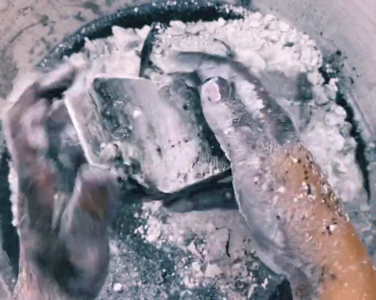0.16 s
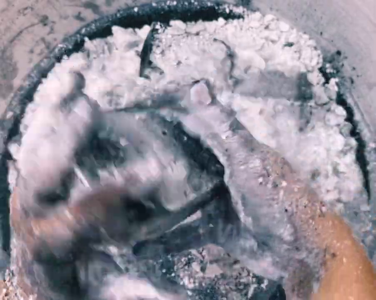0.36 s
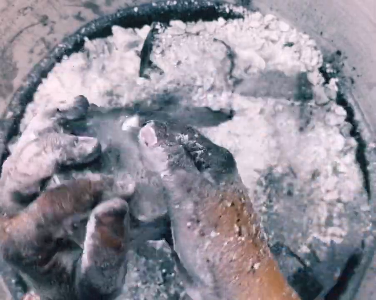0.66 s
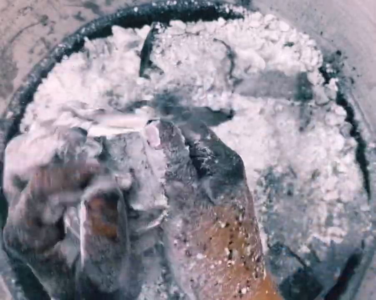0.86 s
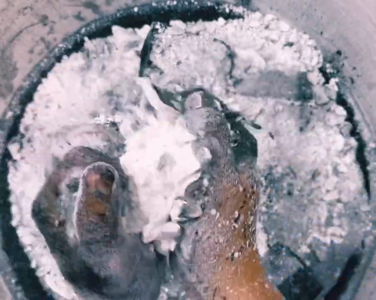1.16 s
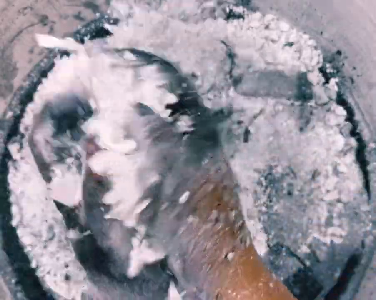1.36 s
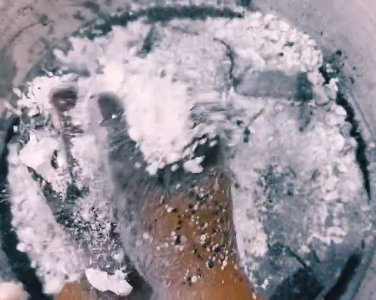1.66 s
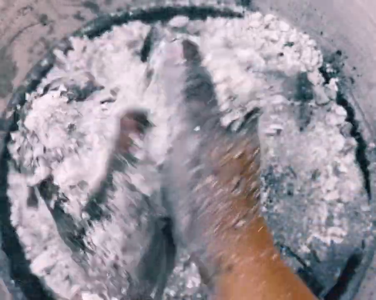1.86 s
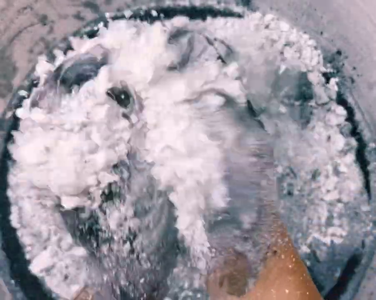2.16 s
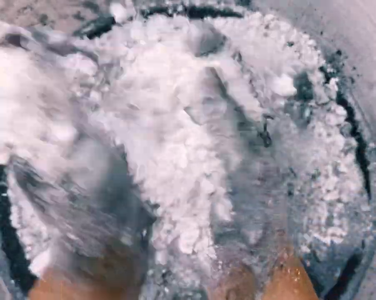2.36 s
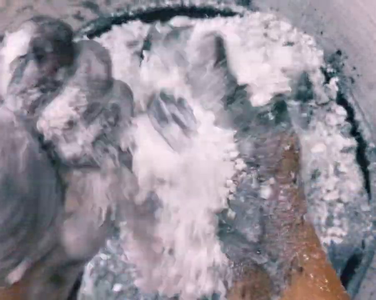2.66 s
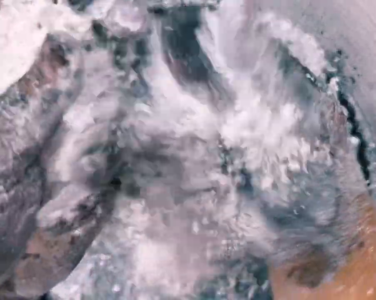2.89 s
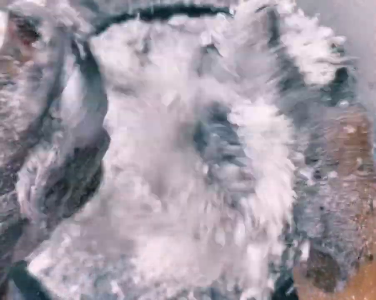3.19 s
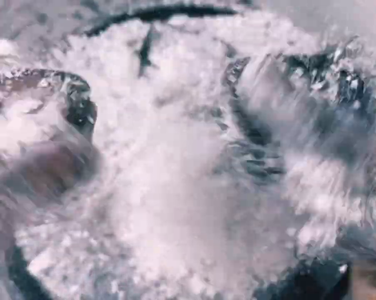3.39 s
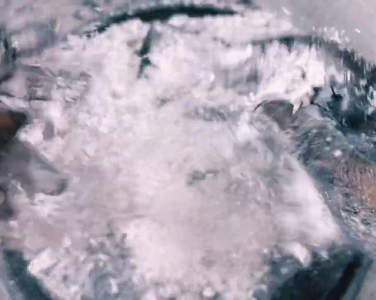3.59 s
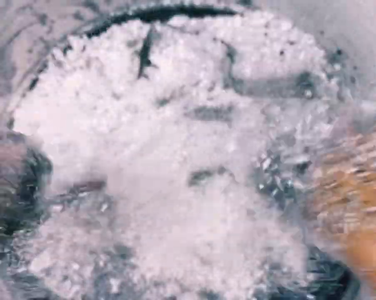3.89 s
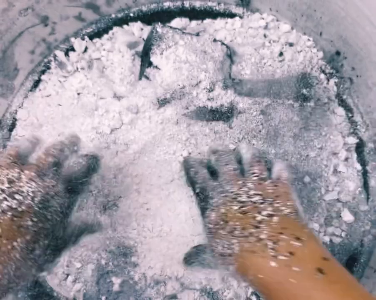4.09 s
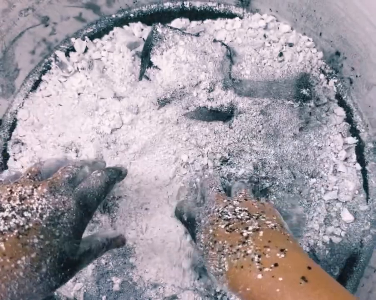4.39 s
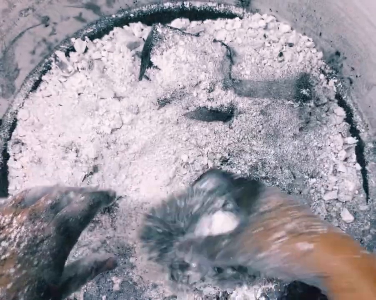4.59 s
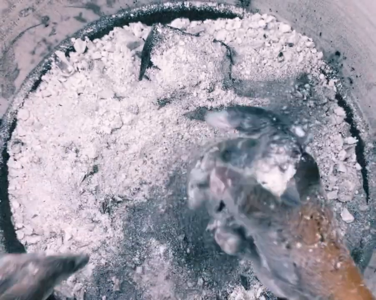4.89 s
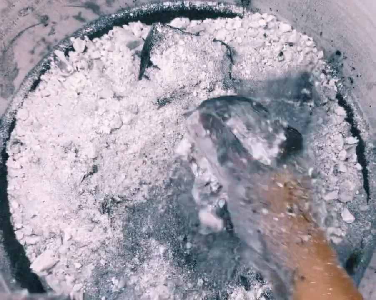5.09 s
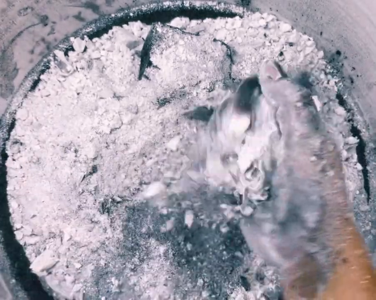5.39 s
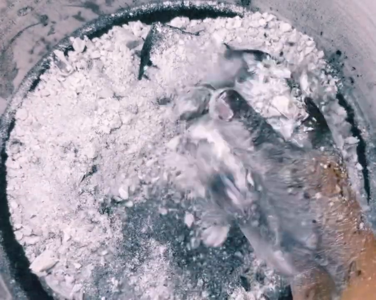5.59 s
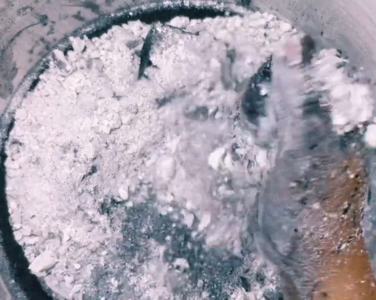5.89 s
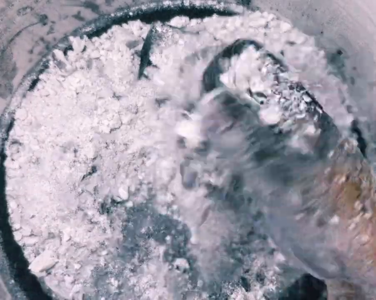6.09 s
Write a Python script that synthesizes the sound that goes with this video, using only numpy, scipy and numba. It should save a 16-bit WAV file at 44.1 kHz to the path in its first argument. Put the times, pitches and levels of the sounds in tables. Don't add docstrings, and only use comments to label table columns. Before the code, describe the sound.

Dry chalk block cracks apart in hands with sharp brittle crunches, crumbs patter into a bowl, dull knocks thump, then a second block snaps.

```python
import sys
import numpy as np
from scipy import signal
from scipy.fft import rfft, irfft, next_fast_len
from scipy.io import wavfile
from scipy.ndimage import uniform_filter1d
from numba import njit

SR = 44100
rng = np.random.default_rng(int(sys.argv[2]) if len(sys.argv) > 2 else 0)


def undo_db(level):
    steps = np.asarray(level, float) / 20
    return 10 ** steps


def int16_out(signal):
    q = np.round(np.clip(np.atleast_2d(signal).T, -1, 1) * 32767)
    wavfile.write(sys.argv[1], SR, q.astype(np.int16))


N = 275623
SPAN = 4096
SPAN_HZ = np.arange(SPAN // 2 + 1) * SR / SPAN + 1


def level(x, db):
    return x * undo_db(db) / np.sqrt(np.mean(x ** 2))


def colour(x, points):
    hz, db = np.transpose(points)
    size = next_fast_len(len(x))
    f = np.arange(size // 2 + 1) * SR / size + 1
    gain = undo_db(np.interp(np.log(f), np.log(hz), db))
    return irfft(rfft(x, size) * gain, size)[:len(x)]


def hump(hz, centre_hz, octaves):
    return np.exp(-.5 * (np.log2(hz / centre_hz) / octaves) ** 2)


def walk(rate_hz):
    hold = int(SR / rate_hz)
    steps = rng.standard_normal(N // 100)[:N // hold + 1]
    return 1.83 * uniform_filter1d(np.repeat(steps, hold), hold)[:N]


def fade(t60_s, size=SPAN):
    return np.exp(-np.log(1000) * np.arange(size) / SR / max(t60_s, .002))


def ring(modes, size=SPAN):
    t = np.arange(size) / SR
    return sum(gain * np.sin(2 * np.pi * hz * t) * fade(t60_s, size) for hz, gain, t60_s in modes)


def add(out, s, peak_db, sound):
    i = int(s * SR)
    sound = sound * np.minimum(np.linspace(4, 0, len(sound)), 1)
    out[i:i + len(sound)] += (sound * undo_db(peak_db) / np.abs(sound).max())[:N - i]


def read(rows):
    s, *columns = np.transpose(rows)
    return [np.interp(np.arange(N) / SR, s, c) for c in columns]


def swells(rest_db, times_s, peaks_db, rises_s, falls_s):
    t = np.arange(0, N, 64) / SR
    power = undo_db(2 * rest_db[::64])
    for s, db, rise_s, fall_s in zip(times_s, peaks_db, rises_s, falls_s):
        away = np.where(t < s, (s - t) / rise_s, (t - s) / max(fall_s, .01))
        power = power + undo_db(2 * (db - 20 * away))
    return np.interp(np.arange(N) / SR, t, 10 * np.log10(power))


# (frequency [Hz], density [dB per Hz])
ROOM_TONE = [(12, -22), (20, -2.5), (69, -2.5), (169, -10.5), (350, -16), (648, -32.5), (1990, -29.5),
             (3900, -32), (5160, -36), (10400, -50), (15000, -40), (16300, -40)]


def room():
    return level(colour(rng.standard_normal(N), ROOM_TONE), -46)


# (time [s], boom level [dB], sway level [dB], 20 dB fall [s])
PUSHES = [(0.0, -46, -33, 0.43), (.33, -43, -43, 0.1), (.6, -38.5, -48, 0.2), (.818, -33.5, -37, 0.07),
          (1.024, -23.5, -53, 0.16), (1.239, -26.5, -46, 0.2), (.74, -50, -45, .1), (1.5, -28, -45, .1),
          (1.377, -28, -44, 0.3), (1.582, -21.5, -53, 0.4), (1.762, -37.5, -33, 0.27),
          (2.337, -37, -44, 1.4), (2.6, -29, -55, 0.96), (3.312, -31.5, -36.5, 0.6), (3.7, -34, -45, 0.13),
          (3.853, -53, -29, 0.05), (3.941, -35, -56, 0.03), (4.218, -28.5, -20, 0.26),
          (4.88, -37, -54.5, 0.1), (5.218, -33, -30, 0.5), (5.773, -37, -42, 1.9)]


def shaking():
    s, boom_db, sway_db, fall_s = np.transpose(PUSHES)
    rise_s = 0.78 * fall_s
    shake = swells(np.full(N, -57.), s, boom_db, rise_s, fall_s)
    sway = swells(np.full(N, -46.), s, sway_db, rise_s, fall_s)
    return shake, sway


# (frequency [Hz], level [dB], share of ring time [ratio])
TABLE_MODES = [(61, -36, 0.51), (82.6, -0.5, 0.86), (98.1, -0.5, 2.26), (139, 0, 0.95), (215.8, -2, 0.51),
               (251, -5.5, 0.24)]


def table(shake_db, sway_db):
    rub = rng.standard_normal(N) * undo_db(2.26 * walk(25))
    modes = [(hz, undo_db(db), 0.13 * share) for hz, db, share in TABLE_MODES]
    boom = signal.fftconvolve(rub, ring(modes))[:N]
    sway = colour(rng.standard_normal(N),
                  [(12, -34), (30, -5), (40, -7.5), (52, -9.0), (64, -8.0), (110, -16.5), (600, -69)])
    return level(boom, -2.6) * undo_db(shake_db) + level(sway, -2.8) * undo_db(sway_db)


@njit
def grains(start, hz, cycles, size, length):
    out = np.zeros(length + 2000)
    for k in range(len(start)):
        w = 2 * np.pi * hz[k] / SR
        pole = np.exp(1j * w - w / (2 * cycles[k]))
        z = size[k] + 0j
        for i in range(start[k], start[k] + min(2000, int(12 * cycles[k] / w))):
            out[i] += z.imag
            z *= pole
    return out[:length]


def patter(count, low_hz, high_hz, cycles, scatter_db, clump_db, dust_db):
    when, pitch, long, big = rng.random((count, 4)).T
    hz = low_hz * (high_hz / low_hz) ** pitch
    size = undo_db(-scatter_db * np.log(1.008 - big)) * np.sqrt(hz / low_hz)
    turns = cycles * (0.44 + 4 * long ** 4)
    crumbs = grains((when * N).astype(np.int64), hz, turns, size / np.sqrt(turns), N)
    band = signal.butter(2, [low_hz, min(high_hz, 20000)], "bandpass", fs=SR, output="sos")
    crumbs, dust = signal.sosfilt(band, [crumbs, rng.standard_normal(N)])
    clumps = undo_db(clump_db * (walk(30) + walk(90) + walk(250)))
    return (level(crumbs, 0) + level(dust, dust_db)) * clumps


def patches(x, depth_db):
    size = next_fast_len(N)
    f = np.arange(size // 2 + 1) * SR / size + 1
    spectrum = rfft(x, size)
    bands = [hump(f, hz, .2) for hz in 1500 * 2 ** np.arange(0, 3.6, .5)]
    total = sum(bands) + 1e-9
    return sum(irfft(spectrum * band / total, size)[:N] * undo_db(depth_db * walk(25)) for band in bands)


# (time [s], effort [dB])
EFFORT = [(0, -40.5), (.064, -45), (.126, -57), (.22, -41), (.34, -40.5), (.43, -49.5), (.59, -45.5),
          (.61, -34), (1.3, -38), (1.9, -37.5), (3.03, -42.5), (4.0, -44), (4.04, -61), (4.5, -58),
          (4.78, -51), (5.0, -43.5), (5.4, -45.5), (6.25, -45.5)]
# (time [s], fine level [dB], coarse level [dB], 20 dB fall [s])
SQUEEZES = [(0.474, -38, -68, 0.2), (0.607, -19, -30, 0.24), (.73, -31, -45, .1), (.78, -31, -48, .15),
            (.835, -21.5, -34.5, 0.2), (.985, -55, -27, 0.15), (1.141, -26.5, -28.5, 0.18),
            (1.355, -30, -24.5, 0.38), (1.42, -34.5, -38, 0.2), (1.5, -30, -32, 0.1),
            (1.727, -43, -25.5, 0.12), (2.556, -28, -25, .09), (2.65, -38.5, -40, 0.1),
            (2.715, -35.5, -37, 0.2), (2.85, -35, -38.5, 0.3), (2.91, -36, -42, .15),
            (3.062, -41, -37.5, .5), (3.2, -42.5, -50, 0), (3.38, -40, -57, 0), (3.61, -53, -52.5, 0.2),
            (3.665, -46, -46, 0.06), (3.94, -46, -39, 0.2), (3.999, -55, -42, 0.05), (4.187, -47, -43, 0.1),
            (4.26, -56.5, -47, 0.44), (4.364, -49, -40.5, -0.17), (4.485, -56, -41, 0.17),
            (4.572, -44, -56, .4), (4.633, -30, -42, 0.04), (4.845, -22, -27, .17), (4.96, -30, -38, .1),
            (5.2, -45, -40, 0), (5.478, -56, -41.5, .15), (5.6, -36.5, -41, 0.6), (5.68, -45, -48, 0.4),
            (5.96, -39, -37, 0.3), (6.075, -38.5, -50, -0.6), (6.02, -42, -37, 0.04), (6.235, -61, -40, 4)]


def crumb_levels(grit):
    effort_db = read(EFFORT)[0]
    s, fine_db, coarse_db, fall_s = np.transpose(SQUEEZES)
    rise_s = np.full(len(s), .012)
    rubbing_db, loose_db = -12, -5
    coarse_rest_db = effort_db + rubbing_db + grit * (loose_db - rubbing_db)
    fine = swells(effort_db, s, fine_db, rise_s, fall_s)
    coarse = swells(coarse_rest_db, s, coarse_db, rise_s, fall_s)
    return fine, coarse


# (time [s], loose crumbs against rubbing skin [0-1])
GRIT = [
    (0, 0),
    (.58, 0.09),
    (.6, 0.86),
    (4.0, 0.7),
    (4.05, 0.3),
    (4.5, .3),
    (4.55, .1),
    (4.76, 0.2),
    (4.8, 0.66),
    (6.25, 0.7),
]
# (frequency [Hz], density [dB per Hz])
SKIN_RUB = [(880, -32), (1500, -9.5), (1910, -15), (2520, -14), (2680, -25), (3680, 1), (4970, -6),
            (6440, -0.5), (8780, -7), (10300, -2.5), (14600, -6), (16300, -13)]
# (frequency [Hz], density [dB per Hz])
FINE_CRUMB = [(880, -8), (1500, 7), (1780, 2), (3300, 2.5), (6640, -1.5), (10600, -10.5), (11800, -11.5),
              (15200, -21), (16300, -41)]


def hands():
    grit = np.clip(read(GRIT)[0], 0, 1)
    fine_db, coarse_db = crumb_levels(grit)
    fine = patter(count=9000, low_hz=1700, high_hz=19000, cycles=1.2,
                  scatter_db=2.5, clump_db=.9, dust_db=-7)
    tilted = [(hz, db + 3 * np.log2(hz / 4000)) for hz, db in FINE_CRUMB]
    rub = colour(rng.standard_normal(N), SKIN_RUB) * undo_db(1.87 * walk(30))
    coarse = patter(count=6000, low_hz=330, high_hz=2300, cycles=1.6,
                    scatter_db=1.8, clump_db=1.3, dust_db=-3)
    loose = level(patches(colour(fine, tilted), depth_db=2.0), -0.7)
    top = np.sqrt(grit) * loose + np.sqrt(1 - grit) * level(rub, 0.58)
    return top * undo_db(fine_db) + level(coarse, -4.5) * undo_db(coarse_db)


# (time [s], peak [dB], centre [Hz], ring t60 [s])
KNOCKS = [(0.349, -32, 407, 0.09), (0.6, -16, 1370, 0.1), (0.703, -16.5, 1650, 0.16),
          (0.844, -14, 2100, 0.077), (0.94, -13.5, 1860, 0.093), (0.977, -16, 830, 0.086),
          (1.075, -12.5, 1270, 0.11), (1.12, -19.5, 1810, 0.042), (1.233, -19, 1450, 0.074),
          (1.356, -20, 1160, 0.15), (1.569, -23.5, 770, 0.061), (1.653, -7, 970, 0.089),
          (1.718, -4.5, 774, 0.11), (2.463, -27, 900, 0.15), (2.554, -7.5, 970, 0.036),
          (2.578, -9, 1160, 0.069), (2.771, -27, 474, 0.065), (3.271, -23, 1500, 0.02),
          (3.15, -30, 1110, .02), (2.372, -28, 1300, 0.024), (4.48, -36, 695, 0.046),
          (1.514, -24, 1500, .05), (1.342, -23, 1200, .05), (.612, -19.5, 750, 0.2), (4.176, -30, 380, 0.1),
          (4.828, -20.5, 1730, 0.12), (4.844, -13.5, 337, 0.029), (4.857, -10, 1640, 0.1),
          (4.913, -21, 1720, 0.16), (5.595, -26, 330, 0.085), (0.621, -11, 1360, 0.071),
          (0.627, -12.5, 1910, 0.033), (1.371, -11, 1100, 0.054), (1.389, -23, 910, 0.084),
          (2.565, -10.5, 1220, 0.081), (5.206, -29.5, 470, 0.06), ]
# (frequency [Hz], level [dB])
BOWL_MODES = [(420, -7), (510, -5.5), (640, -43), (720, 5), (855, 11.5), (940, -3), (1125, 9.5), (1250, 12),
              (1400, 12.5), (1650, 16.5), (1900, 18.5), (2150, 18.5)]


def knocks(out):
    for s, peak_db, hz, t60_s in KNOCKS:
        chance = rng.standard_normal((2, len(BOWL_MODES)))
        blow, bed = rng.standard_normal((2, SPAN))
        modes = []
        for (mode_hz, db), a, b in zip(BOWL_MODES, *chance):
            gain = np.sign(a) * undo_db(db + 2.5 * b) * (hump(mode_hz, hz, .5) + .06)
            modes.append((mode_hz * (1 + .02 * a), gain, min(t60_s, .15) * (800 / mode_hz) ** .5))
        push = fade(.002) + .12 * blow * fade(.7 * t60_s)
        bowl = signal.fftconvolve(push, ring(modes))[:SPAN]
        shuffle = bed * (fade(1.3 * t60_s) + 1.5 * fade(.01))
        rattle = irfft(rfft(shuffle) * hump(SPAN_HZ, 1.1 * hz, .5))
        add(out, s, peak_db, level(bowl, 0) + level(rattle, -3))


# (time [s], peak [dB], centre [Hz], treble share [dB])
CRACKS = [(0.662, 1, 3840, -19.5), (0.6806, -5, 3970, -26), (0.704, -9, 3150, -39),
          (0.742, -8.5, 5800, -21), (0.7684, -6, 4000, -25), (0.7813, -6.5, 6140, -19),
          (0.832, -6, 3530, -21), (0.846, -1, 6540, -15), (0.9025, -11, 6840, -17),
          (0.934, -11.5, 3600, -26), (1.0772, -10, 2660, -68), (1.142, -9, 4070, -16),
          (1.1548, -6.5, 4020, -16), (1.224, -9.5, 3800, -11), (1.245, -16, 2370, -12),
          (1.364, -15, 2720, -38), (1.494, -18, 6000, -15), (1.513, -10.5, 3520, -30),
          (1.602, -13, 6150, -21), (1.6567, -8.5, 2430, -39), (1.7186, -10, 3170, -11),
          (1.811, -18.5, 4800, -11), (1.8501, -18, 3880, -8),
          (2.133, -23.5, 4970, -18), (2.2107, -18.5, 4130, -13), (2.2228, -16, 3580, -29),
           (2.3214, -17, 3450, -11), (2.44, -20, 4570, -16.5), (2.498, -13, 5900, -22),
           (2.5548, -5.5, 2130, -33), (2.764, -18, 5330, -36), (2.8536, -20, 5420, -19),
           (2.9023, -15, 3600, -14), (2.9265, -17, 5360, -23), (3.056, -31, 2740, -14),
           (3.2719, -23, 3770, -24), (3.5247, -15.5, 6200, -22), (3.663, -21.5, 6560, -18),
           (3.8331, -19, 8150, -3), (3.9401, -22.5, 3400, -26), (4.0002, -20.5, 3200, -19.5),
          (4.797, -23.5, 3920, -7.5), (4.8126, -20, 3730, -18), (4.8205, -21, 2500, -25),
          (4.899, -17, 4500, -15), (5.04, -22, 4000, -15), (4.8289, -5.5, 4370, -6),
          (4.8445, 0.5, 3920, -15), (4.8594, 4, 4200, -16.5), (4.8865, -8, 4430, -18),
          (4.915, -0.5, 4460, -17), (4.9546, -6, 4700, -12.5), (4.986, -7.5, 7400, -11),
          (5.051, -16, 9000, -5), (5.051, -12, 6800, -21), (5.089, -19, 4100, -14),
          (5.18, -20.5, 4370, -10), (5.2895, -17, 8960, -5), (5.4147, -13, 2950, -17),
          (5.595, -17, 2330, -7), (5.6264, -20.5, 3840, -25), (5.8084, -15.5, 7140, -6),
          (5.966, -16.5, 3300, -9), (6.0162, -15.5, 2680, -35), (6.0723, -17, 4900, -20),
          (6.1203, -19.5, 5300, -18),
          (0.3511, -12.5, 4180, -15), (0.474, -18, 4000, -13), (0.5774, -27, 7770, -7),
         (.5885, -19, 4500, -15), (0.5968, -1, 3920, -13), (0.6, 2.5, 7100, -4.5), (0.606, 1, 6500, -14),
         (0.6128, -12, 4300, -10), (0.621, 0.5, 4150, -13.5), (0.6277, 0, 4100, -17),
         (0.652, -6, 3860, -16), (0.664, -1.5, 3620, -10), (1.189, -10, 6480, -18),
         (1.3775, -16.5, 2370, -37), (1.6126, -19, 2180, -27), (2.5663, -20, 2210, -23),
         (2.5778, -12, 2180, -28), (4.852, -7, 3980, -9)]


def cracks(out):
    lead = 200
    for s, peak_db, hz, treble_db in CRACKS:
        noise, spike = rng.standard_normal((2, SPAN))
        splinters = noise * undo_db(2.9 * np.repeat(spike[::16], 16))
        burst = fade(.002) + fade(.006 * undo_db(3 * spike[1]))
        crumble = undo_db(-15) * fade(.045) + undo_db(-32) * fade(.15)
        creak = undo_db(-26) * fade(.008, size=lead)[::-1]
        envelope = np.r_[creak, (burst + crumble)[:-lead]]
        broad_db = np.interp(np.log(SPAN_HZ), np.log([900, 2400, 5000, 11000, 17000]),
                             [-30, -7, -7, treble_db + 10, treble_db - 3.5])
        tone = hump(SPAN_HZ, hz, 0.15) + undo_db(broad_db)
        add(out, s - lead / SR, peak_db + 1.2, irfft(rfft(splinters * envelope) * tone))


# (time [s], peak [dB], centre [Hz], ring t60 [s])
THUMPS = [(0.599, -17.5, 238, 0.3), (0.941, -19, 219, 0.12), (1.201, -22.5, 94.2, 0.12),
          (1.237, -20.5, 86.1, 0.071), (1.398, -23, 149, 0.13), (1.725, -15.5, 91.5, 0.21),
          (2.575, -12.5, 110, 0.26), (2.776, -25.5, 93, 0.4), (4.187, -20.5, 61.5, 0.2),
          (4.842, -19.5, 308, 0.15), (4.849, -17, 243, 0.21), (5.589, -33, 91.5, 0.13)]


def thumps(out):
    push = np.diff(np.hanning(200))
    for s, peak_db, hz, t60_s in THUMPS:
        modes = [(f, undo_db(db) * (hump(f, hz, 0.43) + 0.027), t60_s * share) for f, db, share in TABLE_MODES]
        add(out, s, peak_db, signal.fftconvolve(push, ring(modes, size=4 * SPAN)))


# (time [s], peak [dB], centre [Hz])
TICKS = [(0.7035, -9, 1550), (0.7676, -9, 4100), (0.8455, 0, 6030), (0.9006, -6, 6340), (0.94, -8, 1770),
         (1.037, -19, 1700), (1.0559, -12, 2600), (1.2704, -22, 4300), (1.276, -21, 3870),
         (1.285, -26, 6690), (1.3259, -21, 4760), (1.3402, -13, 1730), (1.3707, -13, 1230),
         (1.416, -18, 3620), (1.4564, -19, 4000), (1.5215, -20, 3440), (1.5554, -14, 3440),
         (1.6013, -8, 1730), (1.6334, -13, 3780), (1.6546, -7.5, 1340), (1.755, -19, 1260),
         (1.943, -16.5, 2270), (1.9674, -21, 3230), (2.0283, -21, 5180), (2.0612, -20, 4290),
         (2.1414, -21, 4900), (2.198, -19, 4070), (2.2712, -22, 2790), (2.2817, -23.5, 4650),
         (2.3356, -19, 11600), (2.3713, -23, 1770), (2.4014, -23, 2190), (2.5777, -6.5, 1240),
         (2.599, -14, 1250), (2.6534, -35, 4090), (2.6854, -23, 1780), (2.7142, -21, 2490),
         (2.7254, -27, 3730), (2.813, -22, 4060), (2.8284, -18.5, 5330), (2.8764, -16, 3570),
         (2.914, -16, 5400), (3.017, -25, 3340), (3.0565, -15, 2760), (3.0864, -17, 1730),
         (3.11, -26, 3770), (3.1497, -26, 1510), (3.1994, -25, 6040), (3.2104, -23, 6030),
         (3.2464, -23, 1760), (3.2979, -24, 5430), (3.3807, -30, 1200), (3.3807, -21, 10700),
         (3.4845, -23.5, 4350), (3.495, -20, 4400), (3.506, -29, 2630), (3.525, -12.5, 6200),
         (3.532, -26, 3650), (3.6501, -20.5, 3040),
         (3.7473, -18, 3850), (3.9005, -26.5, 3550), (3.9709, -22, 3180), (4.1091, -35.5, 4020),
              (4.4764, -38, 1320), (4.506, -39, 1550), (4.6914, -32, 1440), (4.8284, -3.5, 4600),
              (4.9142, -1.5, 4590), (4.927, -16, 3810), (4.9593, -6.5, 4780), (5.1602, -19, 3880),
              (5.228, -22, 1570), (5.2584, -24, 11800), (5.475, -31, 3220), (5.5114, -29, 5310),
              (5.557, -24, 1780), (5.676, -18, 5790), (5.7, -29.5, 3650), (5.7285, -26, 4590),
              (5.7803, -28, 6620), (5.874, -20, 2760), (5.916, -25, 3550), (5.9344, -23, 2760),
              (5.9524, -20.5, 2770), (6.0172, -11, 2770), (6.1364, -21, 5250)]


def ticks(out):
    wide = undo_db(-8) * hump(SPAN_HZ, 4250, 1.24)
    for s, peak_db, hz in TICKS:
        envelope = fade(0.0021) + undo_db(-9.5) * fade(0.014) + undo_db(-21) * fade(.05)
        burst = rng.standard_normal(SPAN) * envelope
        burst[0] = 2.6
        add(out, s, peak_db + .6, irfft(rfft(burst) * (hump(SPAN_HZ, hz, .2) + wide)))


# (time [s], peak [dB])
CLINKS = [
    (5.4152, -23.5),
    (5.917, -26.5),
    (5.9532, -27.5),
    (6.0178, -15),
    (5.8735, -29.5),
    (6.1214, -30),
    (5.9344, -29),
]
# (frequency [Hz], level [dB], t60 [s])
SHARD_MODES = [(2770, 2, 0.13), (3300, -3, 0.093), (4300, -10, 0.057), (4700, 2, 0.031), (5300, -5.5, 0.05),
               (5170, -11, 0.042), (5500, -16, 0.057), (6600, 0, 0.037)]


def clinks(out):
    for s, peak_db in CLINKS:
        chance = rng.standard_normal((2, len(SHARD_MODES)))
        chatter, grit = rng.standard_normal((2, SPAN))
        modes = [(hz * (1 + .01 * a), undo_db(db + 3 * c), .6 * t60_s)
                 for (hz, db, t60_s), a, c in zip(SHARD_MODES, *chance)]
        push = fade(.002) + .09 * chatter * fade(.07)
        shard = signal.fftconvolve(push, ring(modes))[:SPAN]
        scrape = irfft(rfft(grit * fade(0.11)) * hump(SPAN_HZ, 4900, 0.33))
        add(out, s, peak_db, level(shard, 0) + level(scrape, 3))


def scene():
    events = np.zeros(N)
    for source in (knocks, cracks, thumps, ticks, clinks):
        source(events)
    return (room() + table(*shaking()) + hands() + events)[None]


def low_pass(x):
    return signal.sosfilt(signal.butter(12, 16460, fs=SR, output="sos"), x)


def record(dry):
    cut = signal.ellip(8, .2, 30, 15750, fs=SR, output="sos")
    mix = signal.sosfilt(cut, np.clip(dry, -.97, .97))
    return low_pass(mix)


dry = scene()
out = record(dry)
int16_out(out)
```